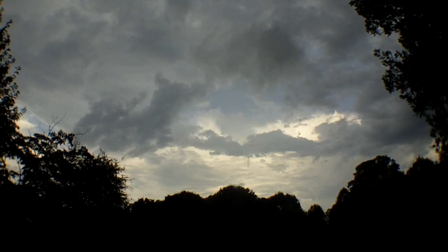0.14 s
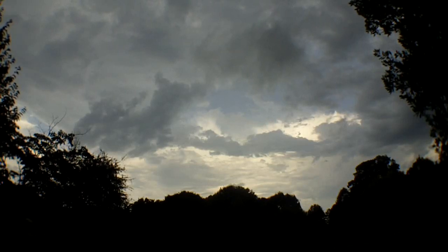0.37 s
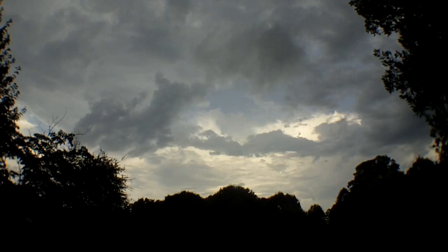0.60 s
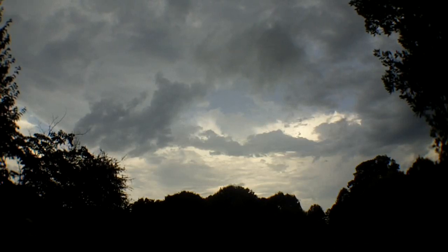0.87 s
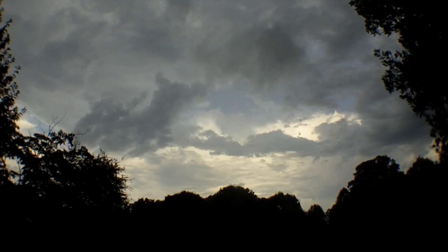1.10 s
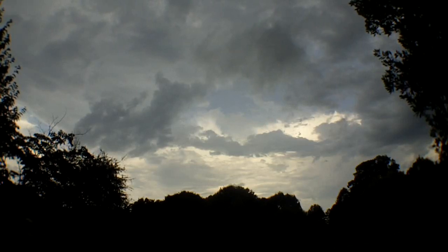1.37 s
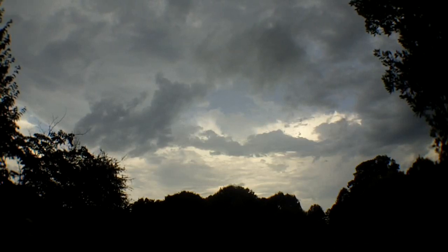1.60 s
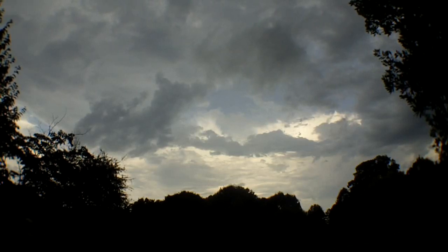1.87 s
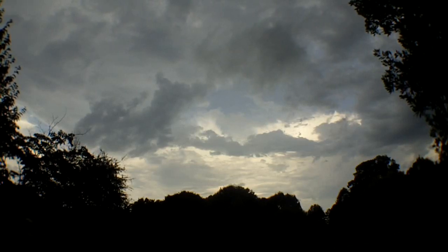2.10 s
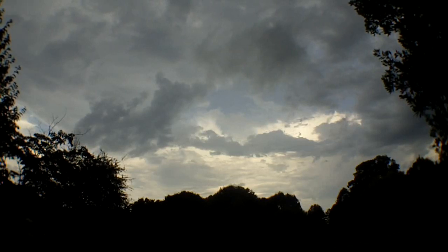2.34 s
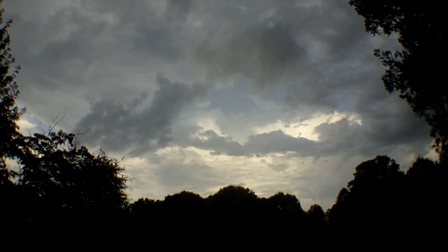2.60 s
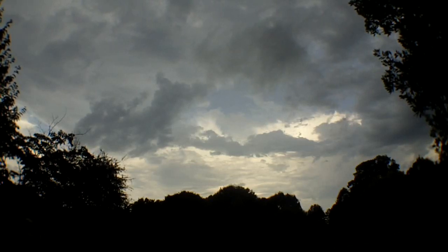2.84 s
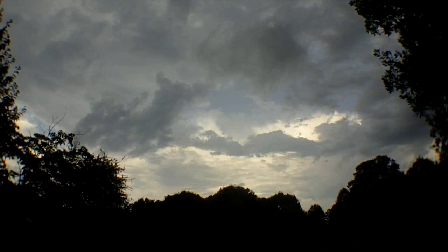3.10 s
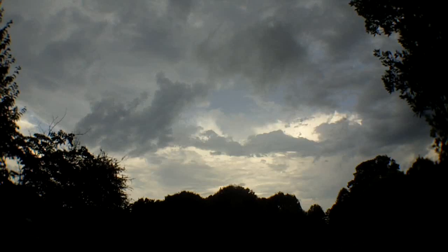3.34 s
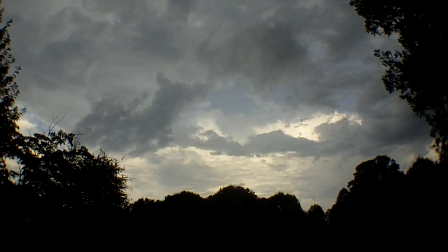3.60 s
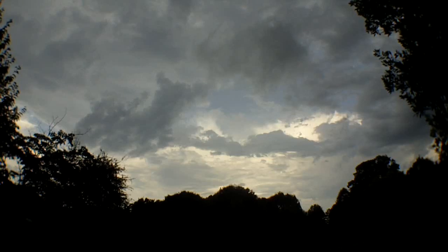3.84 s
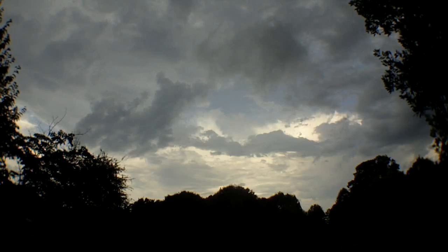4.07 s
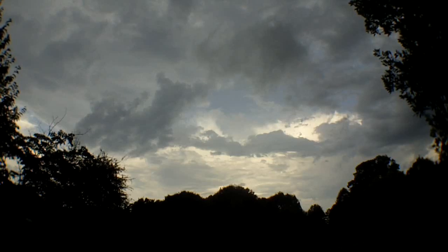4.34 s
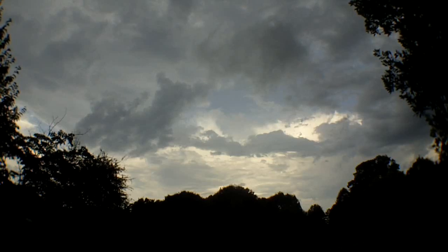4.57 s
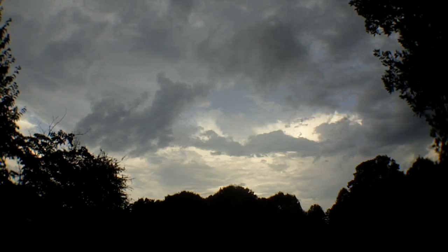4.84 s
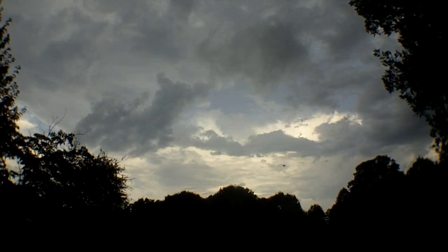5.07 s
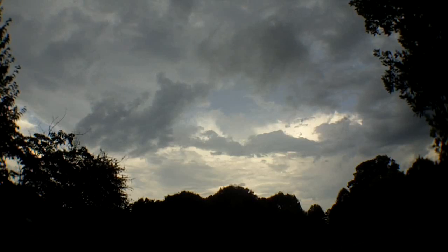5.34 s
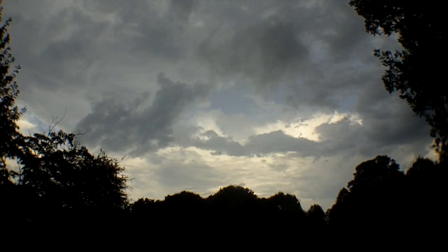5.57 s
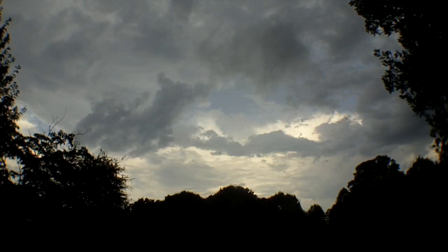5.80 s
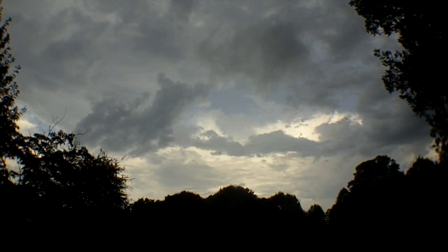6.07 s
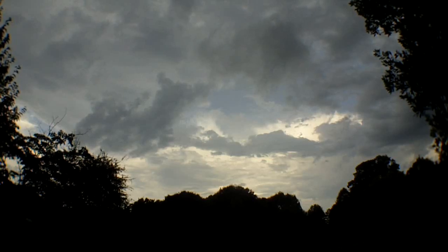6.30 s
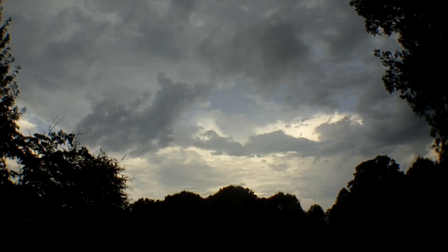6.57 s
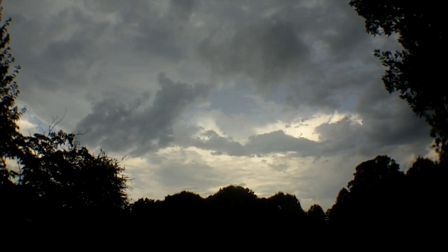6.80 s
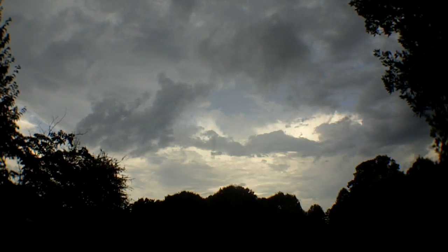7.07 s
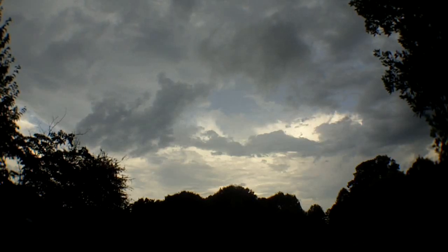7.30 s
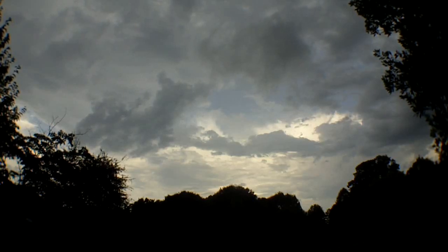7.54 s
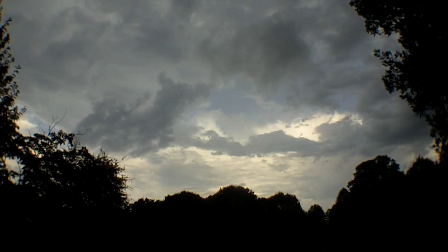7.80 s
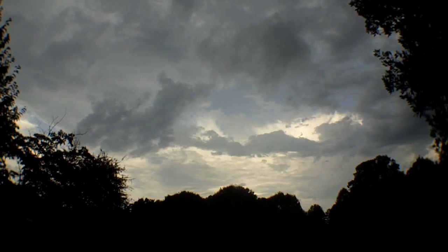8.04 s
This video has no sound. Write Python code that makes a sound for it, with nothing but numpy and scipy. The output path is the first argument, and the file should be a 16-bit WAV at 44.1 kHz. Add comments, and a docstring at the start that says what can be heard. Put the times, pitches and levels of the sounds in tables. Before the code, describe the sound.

Low far-off thunder rumbles and swells throughout under constant pattering rain, with crisp nearby drips and one loud, hard knock past the middle.

```python
"""Steady rain on leaves and a porch, at a small camera's two close microphones: hiss of coloured noise.
Far thunder, streams of random shocks, rolls in waves and booms in the porch.
Near drops tick as clusters of dying partials; a few ring one clear pitch.
Two drops knock the housing and ring its modes; the second, far heavier, overloads the camera.
The electronics whine on one faint steady sine."""
import sys
import numpy as np
from scipy import signal
from scipy.fft import rfft, irfft, next_fast_len
from scipy.io import wavfile
from scipy.ndimage import uniform_filter1d

SR = 44100
rng = np.random.default_rng(int(sys.argv[2]) if len(sys.argv) > 2 else 0)


def decibels_to_gain(level_db):
    """Convert a level in decibels to a linear amplitude gain (20 dB per decade)."""
    exponent = np.asarray(level_db, float) / 20
    return 10 ** exponent


def inscribe(sig):
    """Save sig as 16-bit PCM at rate SR to the path in sys.argv[1].

    A 1-D sig is mono; a 2-D sig holds one channel per row.
    Samples are clipped to [-1, 1] before scaling.
    """
    pcm = np.round(np.clip(np.atleast_2d(sig).T, -1, 1) * 32767)
    wavfile.write(sys.argv[1], SR, pcm.astype(np.int16))


N = 360297


def level(x, db):
    """Scale to an rms level."""
    return x * decibels_to_gain(db) / np.sqrt(np.mean(x ** 2))


def colour(x, table, share=1):
    """Weight the spectrum by (Hz, dB) points, straight lines over log frequency."""
    size = next_fast_len(N)
    hz, db = np.transpose(table)
    log_hz = np.log(np.maximum(np.fft.rfftfreq(size, 1 / SR), 1))
    gain = decibels_to_gain(share * np.interp(log_hz, np.log(hz), db))
    return irfft(rfft(x, size) * gain, size)[..., :N]


def walk(rate_hz):
    """Random levels held 1 / rate_hz s and slewed twice, spread 1."""
    hold = int(SR / rate_hz)
    steps = np.repeat(rng.standard_normal(N // hold + 1), hold)
    steps = uniform_filter1d(uniform_filter1d(steps, hold), hold)[:N]
    return steps / steps.std()


def ring(start_s, hz, t60_s):
    """One mode struck at start_s: a sine that dies exponentially."""
    t = np.maximum(np.arange(N) / SR - start_s, 0)
    return np.sin(2 * np.pi * hz * t) * np.exp(-np.log(1000) * t / t60_s)


# Swells and fades. Each row: time in s, level in dB of the roll, of the boom, of the rattle.
THUNDER_DB = [(0.0, -29.5, -33, -36.5), (0.35, -33, -37.5, -41), (0.8, -32, -39, -43), (1.1, -35, -37, -37),
              (1.45, -33.5, -35.5, -37), (1.7, -38, -39.5, -41.5), (2.1, -34, -37.5, -38.5),
              (2.45, -29.5, -39.5, -45), (2.9, -33, -40.5, -42.5), (3.4, -37, -41, -45.5),
              (3.9, -38, -47.5, -49), (4.2, -36.5, -43, -46.5), (4.45, -35, -34, -38),
              (4.75, -37, -37, -45), (5.05, -37, -43, -46.5), (5.4, -34, -35, -38.5),
              (5.75, -34, -29.5, -35.5), (6.1, -32, -28.5, -34), (6.7, -34.5, -30.5, -35),
              (6.95, -35.5, -34, -39), (7.25, -34.5, -39, -43), (7.7, -35.5, -38.5, -44.5),
              (7.85, -30, -29, -39), (8.17, -35, -27, -33)]
# Colours of the four parts. Each row: frequency in Hz, relative density in dB per Hz.
ROLL_COLOUR = [(8, -36), (14, -9), (28, 10.5), (45, 8.5), (62, -1.5), (90, -39), (200, -87)]
RUMBLE_COLOUR = [(25, -90), (50, -10), (68, 1), (100, -2), (130, -3), (165, -11.5), (350, -90)]
BOOM_COLOUR = [(50, -90), (115, -30), (140, -9), (165, -4), (190, 0), (210, -3), (230, -8), (260, -10),
               (320, -32), (700, -90)]
RATTLE_COLOUR = [(100, -90), (210, -16), (280, 1.5), (330, 5), (375, 0.5), (410, 0), (450, -4.5), (495, 0),
                 (560, -6), (700, -9), (1000, -21), (2500, -90)]
# Each list: roll, rumble, boom, rattle.
# Pitch of the part in Hz, as the claps see it.
PART_HZ = [38, 95, 190, 370]
# Side against mid in dB.
THUNDER_SIDE_DB = [-19.5, -28, -40, -23]
# Levelling span in s: quicker swells come from the shocks themselves.
SWELL_S = [0.12, 0.29, 0.38, 0.13]


def thunder():
    """Shocks of uneven size from all along the bolt; long paths leave the roll, shorter ones boom and rattle."""
    shocks_per_s, shock_spread_db, rumble_against_roll_db = 4000, 1.5, -1
    time_s, roll_db, boom_db, rattle_db = np.transpose(THUNDER_DB)
    levels_db = (roll_db, roll_db + rumble_against_roll_db, boom_db, rattle_db)
    colours = (ROLL_COLOUR, RUMBLE_COLOUR, BOOM_COLOUR, RATTLE_COLOUR)
    parts = zip(levels_db, colours, PART_HZ, THUNDER_SIDE_DB, SWELL_S)
    out = 0
    for db, part_colour, hz, side_db, swell_s in parts:
        arrives = rng.random((2, N)) < shocks_per_s / SR
        size = decibels_to_gain(shock_spread_db * rng.exponential(size=(2, N)))
        size = size * rng.choice([-1, 1], size=(2, N))
        mid, side = colour(size * arrives, part_colour)
        # overlapping echoes even out the stream of shocks
        span = int(swell_s * SR)
        mid = mid / np.sqrt(uniform_filter1d(uniform_filter1d(mid ** 2, span), span))
        stereo = mid + level(side, side_db) * np.array([[1], [-1]])
        swell = decibels_to_gain(np.interp(np.arange(N) / SR, time_s, db))
        out = out + stereo * np.sqrt(swell ** 2 + claps(hz))
    return out


# Rain alike (mid) and unlike (side) at the microphones.
# Each row: frequency in Hz, relative density in dB per Hz.
RAIN_MID_COLOUR = [(100, -60), (200, -42), (400, -0.5), (550, -2.5), (700, 1.5), (1000, 4), (1700, 2.5),
                   (2300, -2.5), (2800, -8), (3500, -15.5), (4500, -17.5), (6000, -22), (7700, -18.5),
                   (9000, -20), (12000, -26), (15000, -27)]
RAIN_SIDE_COLOUR = [(100, -40), (200, -14), (400, -9), (900, -6.5), (1100, -4.5), (2000, -3.5), (2830, -1),
                    (3800, -7), (4700, -14.5), (6000, -26), (7300, -14), (10000, -18), (15000, -31.5)]
# Tilt between sides, shared out unevenly below. Each row: frequency in Hz, left minus right in dB at full share.
RAIN_BALANCE = [(700, 1), (1500, 0), (2600, -1.5), (3800, -1), (6000, 4), (8500, -0.5), (11000, -1.5),
                (14000, 1.5)]


def far_rain():
    """Countless far drops merge into hiss that flickers a little."""
    mid_db, side_against_mid_db, flicker_db, flicker_hz = -42.5, -9.5, 0.42, 14
    strength = decibels_to_gain(mid_db + flicker_db * walk(flicker_hz))
    mid = level(colour(rng.standard_normal(N), RAIN_MID_COLOUR), 0)
    side = level(colour(rng.standard_normal(N), RAIN_SIDE_COLOUR), side_against_mid_db)
    left = colour(strength * (mid + side), RAIN_BALANCE, 0.54)
    right = colour(strength * (mid - side), RAIN_BALANCE, -0.33)
    return np.array([left, right])


def whine():
    """A faint steady tone of the electronics: one sine."""
    hz, rms_db = 7867, -70.5
    return np.sqrt(2) * decibels_to_gain(rms_db) * np.sin(2 * np.pi * hz * np.arange(N) / SR)


def bursts(start_s, peak_db, hz, pan_db, t60_s, octaves, count=12):
    """Each impact is a cluster of dying partials strewn evenly over some octaves around its pitch."""
    rise_s, spread_lag_s = 0.00019, 0.0011
    t = np.arange(int(t60_s * SR)) / SR
    chance = rng.random((len(start_s), count, 2))
    place = (np.arange(count) + chance[..., 0]) / count - 0.5
    pitch_hz = hz[:, None] * 2 ** (np.reshape(octaves, (-1, 1)) * place)
    pitch_hz = np.minimum(pitch_hz, 0.4 * SR)
    waves = np.sin(2 * np.pi * (pitch_hz[..., None] * t + chance[..., 1:])).sum(axis=1)
    waves = waves * np.exp(-np.log(1000) * t / t60_s) * (1 - np.exp(-t / rise_s))
    waves = waves / np.abs(waves).max(axis=1, keepdims=True)
    out = np.zeros((2, N + SR))
    # the drop sounds once it has spread out after first touch
    at = ((start_s + spread_lag_s) * SR).astype(int)[:, None] + np.arange(len(t))
    for side, sign in enumerate((1, -1)):
        np.add.at(out[side], at, waves * decibels_to_gain(peak_db + sign * pan_db / 2)[:, None])
    return out[:, :N]


# Clear near drops. Each row: first touch in s, splash peak in dB, splash pitch in Hz,
# peak in dB of the tap before the leaf filters it.
DROPS = [(0.064, -47, 7870, -25), (0.1699, -40, 8700, -24), (0.354, -46, 8980, -38),
         (0.7026, -44, 8950, -43), (0.7632, -37, 8900, -27), (0.7754, -40, 7860, -45),
         (0.9614, -43, 6610, -34), (1.2437, -42, 7680, -29.5), (1.4715, -41, 8310, -32),
         (1.5443, -37, 7500, -24), (2.0595, -43, 8830, -34), (2.106, -53, 6500, -26),
         (2.1367, -36.5, 7560, -36), (2.332, -42, 7600, -43), (2.577, -40, 8150, -29),
         (2.8037, -35, 9350, -27.5), (2.9026, -38, 7900, -39), (3.0818, -41, 7570, -45),
         (3.5457, -43, 7860, -41), (4.318, -42, 11600, -43), (4.521, -38, 10800, -30),
         (5.585, -43, 8740, -41), (5.6639, -43, 7710, -46), (6.023, -40, 7530, -26),
         (6.1962, -41, 7700, -42), (6.5398, -37, 8100, -28), (6.57, -42, 8840, -46),
         (7.0612, -43, 10000, -40), (7.3965, -37, 8720, -46), (7.4658, -44, 7960, -44),
         (8.09, -43, 7300, -47)]
# What a tapped leaf passes on. Each row: frequency in Hz, gain in dB.
LEAF = [(600, 1.5), (1000, 2), (2400, -0.5), (3000, -5.5), (4500, -13)]


def near_drops():
    """Each near drop splashes high and taps the leaf lower; many small ones patter between the clear ones."""
    splash_t60_s, tap_t60_s = 0.012, 0.018
    start_s, splash_db, splash_hz, tap_db = np.transpose(DROPS)
    place, pitch = rng.random((len(start_s), 2)).T - 0.5
    pan_db = 2 * place
    tap_hz = 1760 * 2 ** (0.34 * pitch)
    splash = bursts(start_s, splash_db, splash_hz, pan_db, splash_t60_s, octaves=1.1)
    tap = bursts(start_s, tap_db, tap_hz, pan_db / 2, tap_t60_s, octaves=2.3)

    patter_count, least_splash_db, least_tap_db, size_spread_db = 1600, -59, -45.5, 4
    when, size, pitch, tap_pitch, place, width = rng.random((patter_count, 6)).T
    patter_s = when * N / SR
    size_db = -size_spread_db * np.log(1 - 0.97 * size)
    patter_splash = bursts(patter_s, least_splash_db + size_db, 7000 * 1.8 ** pitch,
                           8 * (place - 0.5), splash_t60_s, 0.27 + 0.84 * width, count=8)
    patter_tap = bursts(patter_s, least_tap_db + size_db, 1000 * 2.2 ** tap_pitch,
                        2 * (place - 0.5), splash_t60_s, 1.64, count=8)
    return splash + patter_splash + colour(tap + patter_tap, LEAF)


# Single claps that stand out of the roll.
# Each row: time of the peak in s, peak level in dB at its pitch, pitch in Hz where it is strongest.
CLAPS = [(0.07, -25.5, 80), (0.91, -30, 90), (1.02, -33, 190), (1.1, -34, 400), (1.16, -26, 130),
         (1.41, -29.5, 282), (2.0, -28.5, 70), (2.11, -36, 190), (2.2, -26, 45), (2.48, -24, 55),
         (2.77, -31, 140), (4.0, -38, 170), (4.71, -34.5, 187), (5.45, -44, 300), (5.75, -24, 139),
         (5.98, -27.5, 190), (6.27, -28, 190), (6.62, -26, 114), (7.14, -29, 80), (7.88, -20.5, 36),
         (7.94, -21.5, 190), (7.95, -21, 40), (8.1, -27, 120)]


def claps(part_hz):
    """Power of the claps in one part of the thunder: each swells, dies, and is weaker away from its pitch."""
    rise_s, fall_s, loss_db_per_octave = 0.03, 0.03, 9.5
    t = np.linspace(0, N / SR, N // 64)
    peak_s, peak_db, hz = np.transpose(CLAPS)[..., None]
    shape = np.exp(-((t - peak_s) / np.where(t < peak_s, rise_s, fall_s)) ** 2)
    octaves_off = abs(np.log2(part_hz / hz))
    power = shape * decibels_to_gain(peak_db - loss_db_per_octave * octaves_off) ** 2
    return np.interp(np.arange(N) / SR, t, power.sum(axis=0))


# Drops that ring one clear pitch. Each row: start in s, level in dB before decay, pitch in Hz, t60 in s.
PINGS = [(.1712, -26.5, 2300, 0.019), (1.3867, -48, 9480, .07), (2.53, -56, 9480, .07),
         (4.5232, -25.5, 715, 0.027), (7.0988, -49.5, 9470, 0.14)]


def pings():
    """A hollow or thin metal thing rings on a single mode."""
    return sum(decibels_to_gain(db) * ring(start_s, hz, t60_s) for start_s, db, hz, t60_s in PINGS)


# Drops on the camera. Each row: start in s, blow in dB.
KNOCKS = [(4.5229, -24), (4.93509, 0)]
# Modes of the housing. Each row: frequency in Hz, swing at left and at right for a 0 dB blow
# (full scale 1, sign: first direction), t60 in s.
HOUSING = [(99, 0.17, 0.11, 0.082), (420, -0.18, -0.35, 0.056), (595, -0.31, -0.3, 0.02),
           (835, -0.22, -0.18, 0.019), (1072, -.74, -.53, .0092), (1279, .94, .99, .0102),
           (1489, -1.28, -1.19, .0064), (1845, .3, -.04, .0091), (2091, 0, .45, .0114),
           (2245, .29, .26, .0194), (4100, 0.029, 0.1, 0.0049), (4560, 0.16, -0.012, 0.0054),
           (6060, 0.13, 0.083, 0.0031), (7300, 0.1, -0.018, 0.0059), (10100, -0.049, 0.0016, 0.0045),
           (12000, -0.29, -0.19, 0.0017), (14500, 0.17, 0.017, 0.0037)]


def knocks():
    """Every blow rings the same modes; each microphone sits on them differently."""
    out = np.zeros((2, N))
    for start_s, blow_db in KNOCKS:
        for hz, left, right, t60_s in HOUSING:
            swing = decibels_to_gain(blow_db) * np.array([[left], [right]])
            out = out + swing * ring(start_s, hz, t60_s)
    return out


def scene():
    """All sources at the two microphones."""
    return thunder() + far_rain() + near_drops() + pings() + knocks()


def low_pass(x):
    """Removes everything above the highest recorded frequency."""
    return signal.sosfilt(signal.butter(12, 16400, fs=SR, output="sos"), x)


# Microphone ports cancel around 5 kHz and the top is cut. Each row: frequency in Hz, gain in dB.
PORTS = [(4400, 0), (4850, -4), (5200, -15), (5420, -60), (5600, -14.5), (5900, -0.5), (6400, 0.5),
         (14900, 3.5), (15400, -14), (16400, -40)]
# Converter's rest position, full scale 1: left, right.
OFFSET = (-.0186, -.0251)


def record(dry):
    """Ports colour the sound, the electronics whine, the converter sits off zero and clips at full scale."""
    volts = colour(dry, PORTS) + whine() + np.array(OFFSET)[:, None]
    clipped = np.clip(volts, -1, 1)
    return low_pass(clipped)


dry = scene()
out = record(dry)
inscribe(out)
```